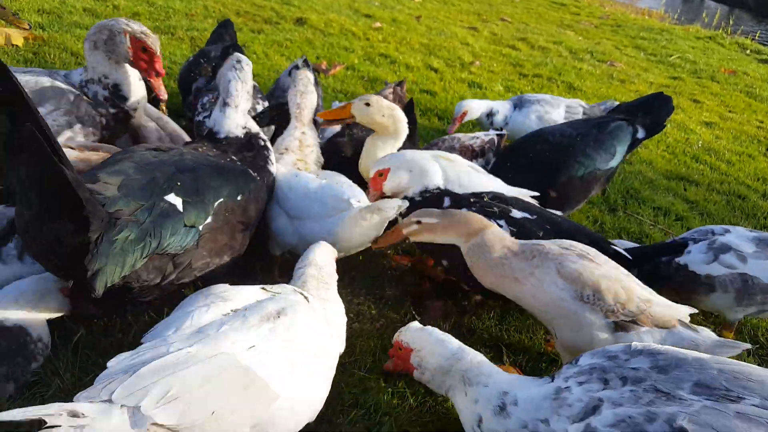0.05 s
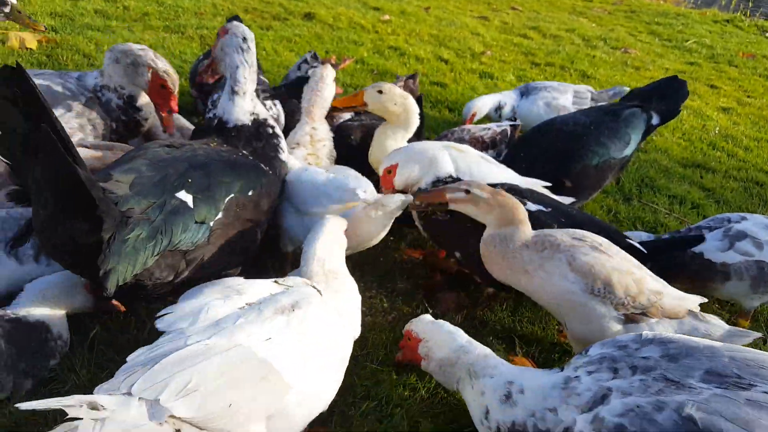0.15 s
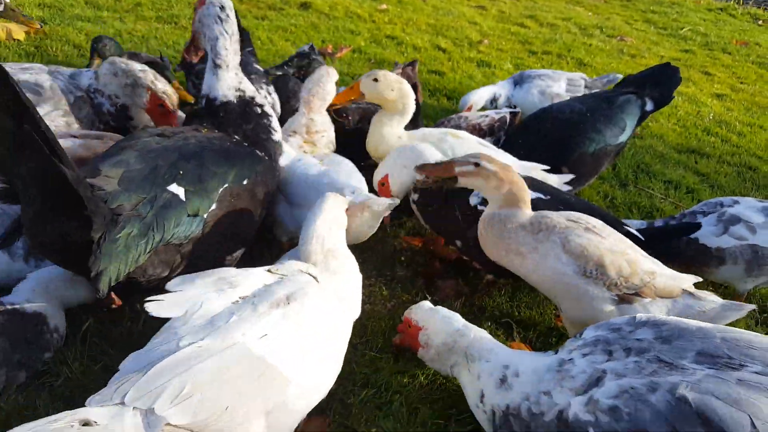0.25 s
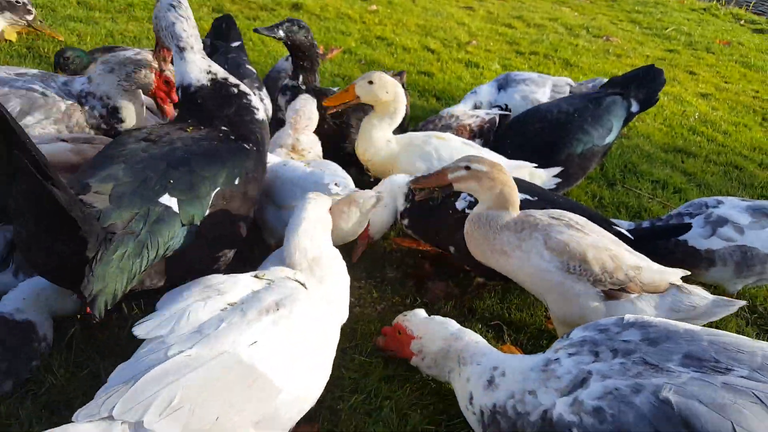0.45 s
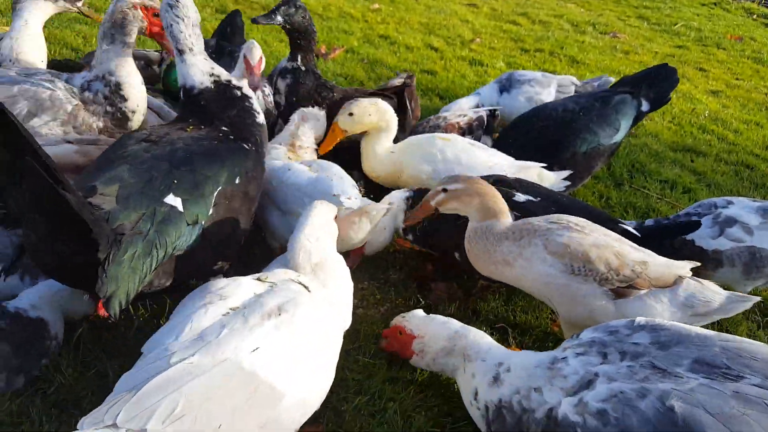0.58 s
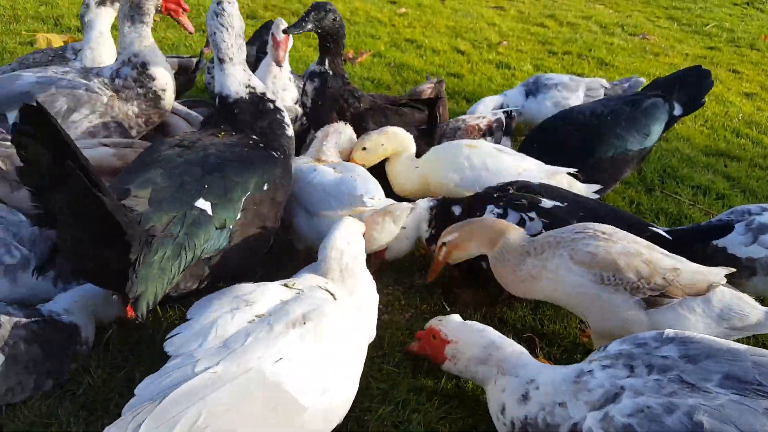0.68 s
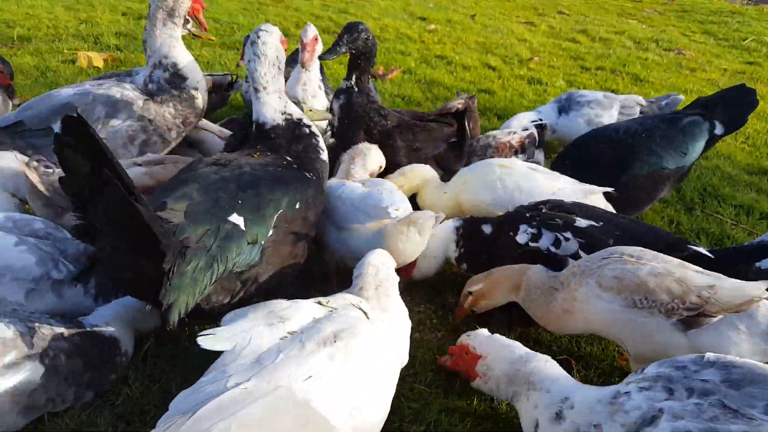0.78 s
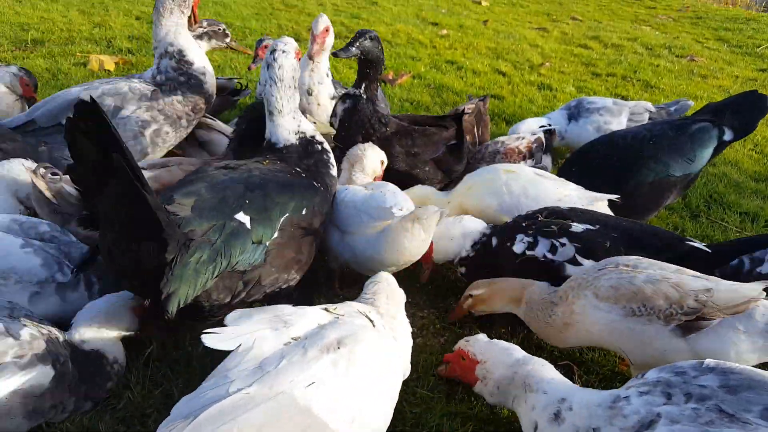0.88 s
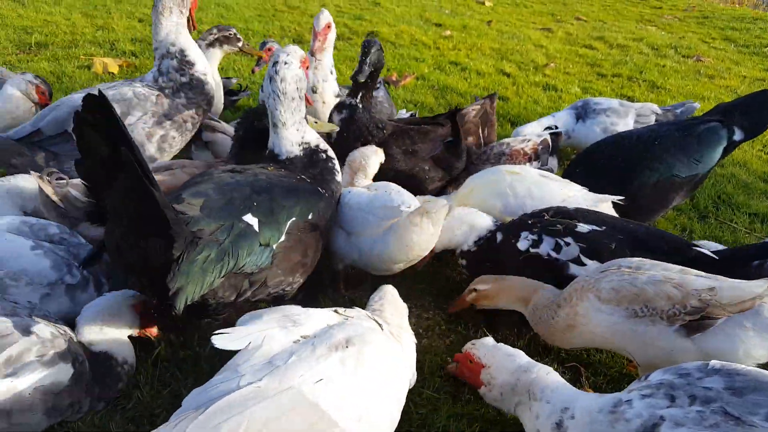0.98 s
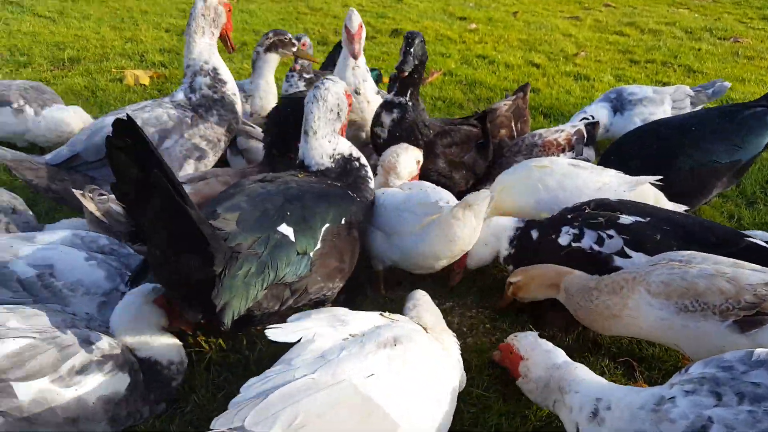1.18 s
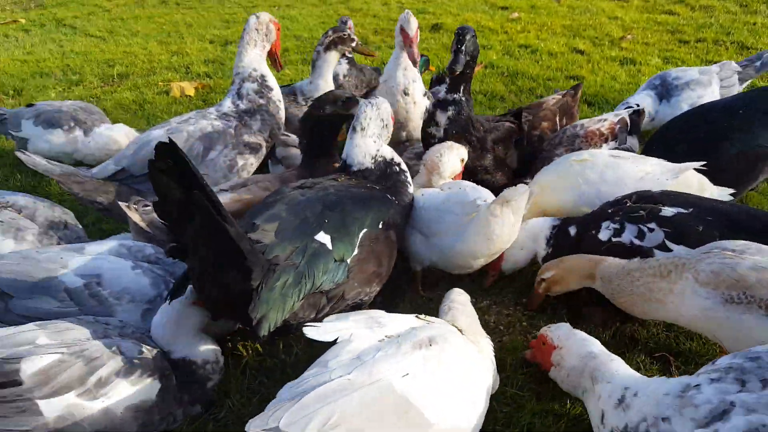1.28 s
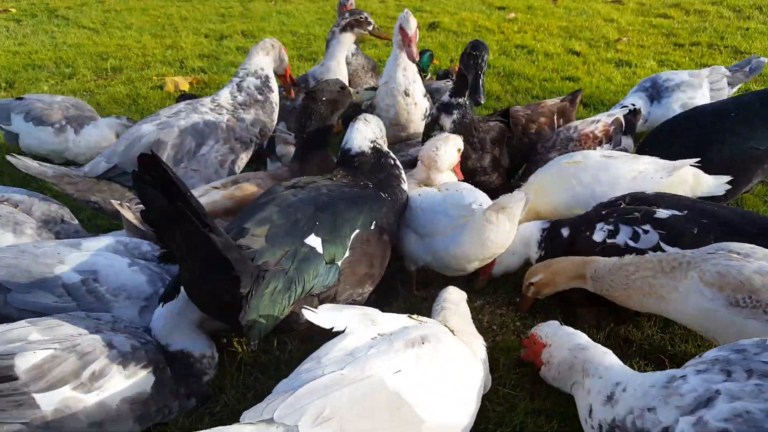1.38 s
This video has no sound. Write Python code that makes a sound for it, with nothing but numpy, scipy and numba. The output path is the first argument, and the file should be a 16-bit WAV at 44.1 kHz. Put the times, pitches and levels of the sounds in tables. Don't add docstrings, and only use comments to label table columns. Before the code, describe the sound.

A single short, nasal duck quack sounds at about 0.24-0.30 s, edged by tiny windpipe wheezes and preceded by a low bill knock at 0.2 s. Throughout the roughly 1.5 s, bills click, nibble and peck, sharpest near 0.15 and 0.65 s, with grass tearing, faint coos, hoarse huffs and feather rustles. Quiet park hum and breeze continue; low wind thumps grow after 1.0 s, strongest near 1.45 s.

```python
import sys
import numpy as np
from scipy import signal
from scipy.io import wavfile
from scipy.ndimage import uniform_filter1d
from numba import njit

SR = 44100
rng = np.random.default_rng(int(sys.argv[2]) if len(sys.argv) > 2 else 0)


def dump(signal):
    limited = np.clip(np.atleast_2d(signal).T, -1, 1)
    pcm = np.round(limited * 32767).astype(np.int16)
    wavfile.write(sys.argv[1], SR, pcm)


def to_linear_factor(level_db):
    exponent = np.asarray(level_db, float) / 20
    return 10 ** exponent


N = 63945


@njit
def svf(x, hz, width, low):
    y, b, l = np.empty(len(x)), 0., 0.
    for i in range(len(x)):
        g, k = np.tan(np.pi * hz[i] / SR), width / hz[i]
        v = (b + g * (x[i] + 1e-18 - l)) / (1 + g * (g + k))
        y[i] = low * (l + g * v) + (1 - low) * k * v
        b, l = 2 * v - b, l + 2 * g * v
    return y


def band(x, hz, width, low=0.):
    return svf(x, np.clip(hz + np.zeros(len(x)), 10, .45 * SR), float(width), low)


def noise():
    return rng.standard_normal(N)


def unit(x):
    return x / np.sqrt(np.mean(x ** 2))


def walk(rate):
    hold = int(SR / rate)
    steps = np.repeat(rng.standard_normal(N // hold + 1), hold)
    return 1.28 * uniform_filter1d(uniform_filter1d(steps, hold), hold)[:N]


def curve(table, axis):
    rows = np.array(table)
    return np.interp(np.arange(N) / SR, rows[:, 0], rows[:, axis])


def swell(start, length):
    return np.sin(np.pi * np.clip((np.arange(N) / SR - start) / length, 0, 1))


def lean(pan_db):
    return np.array([[pan_db], [-pan_db]]) / 2


def place(x, pan_db):
    lag_s = 4e-5
    late = np.interp(np.arange(N) - lag_s * SR, np.arange(N), x)
    return to_linear_factor(lean(pan_db)) * np.array([late, x])


# (frequency [Hz], level [dB per Hz])
PARK_TONE = [(88, -30), (150, -5.5), (492, -9), (713, -5.5), (866, -10), (1230, -7.5), (2340, -15),
             (7530, -21), (15800, -31.5)]
# (frequency [Hz], likeness [0-1])
PARK_LIKENESS = [(60, 0), (250, 1), (1000, 0.59), (2000, 0.13), (4000, 0), (9000, .0)]
# (frequency [Hz], left minus right [dB])
PARK_BALANCE = [(250, 3), (4000, -5), (6500, 2.5), (14000, 3.5)]


def park():
    def read(table, hz):
        rows = np.array(table)
        return np.interp(np.log(hz), np.log(rows[:, 0]), rows[:, 1])

    level_db = -48
    out, slow, quick = 0, walk(2.27), walk(23.0)
    for hz in 160 * 2 ** np.arange(0, 6.7, 1 / 3):
        edges = [hz / 1.143, min(hz * 1.126, .45 * SR)]
        third = signal.butter(2, edges, "band", fs=SR, output="sos")
        mid, side = unit(signal.sosfilt(third, rng.standard_normal((2, N))))
        like = np.clip(read(PARK_LIKENESS, hz), 0, .99)
        db = read(PARK_TONE, hz) + 10 * np.log10(hz)
        db = db + 0.78 * slow + 0.72 * quick + 1.0 * walk(11.85) + lean(read(PARK_BALANCE, hz))
        out = out + to_linear_factor(db) * (np.sqrt(1 + like) * mid + np.sqrt(1 - like) * side * np.array([[1], [-1]]))
    return unit(out) * to_linear_factor(level_db)


def breeze():
    level_db, buffet_db, centre_hz, width_hz, shared = -49, 3, 83.7, 68.5, 0.19

    def tumble():
        air = band(band(noise(), centre_hz, width_hz), centre_hz, 2.8 * width_hz)
        return unit(air) * to_linear_factor(buffet_db * walk(24.9))

    own = np.array([tumble(), tumble()])
    return to_linear_factor(level_db) * (np.sqrt(1 - shared) * own + np.sqrt(shared) * tumble())


# (time [s], length [s], level [dB], centre [Hz], left minus right [dB])
GUST_THUMPS = [(.005, 0.029, -39.5, 112, 7), (0.598, 0.06, -47.5, 104, -5), (0.722, 0.069, -43, 90, -7),
               (.8, .05, -50, 100, -6), (0.902, .07, -50.5, 83, -5), (1.009, 0.042, -35.5, 109.5, 0),
               (1.07, 0.02, -41, 140, -5), (1.16, 0.031, -47, 121, -2), (1.269, 0.0364, -43.5, 93, 2),
               (1.32, 0.033, -39, 113, -6), (1.374, 0.023, -37, 134, 1), (1.391, 0.035, -36.5, 157, 6),
               (1.436, 0.033, -31.5, 165.5, 0)]


def gusts():
    roar_db, out = -7, 0
    for s, d, db, hz, pan in GUST_THUMPS:
        waver = walk(60.24) + 0.9 * np.array([walk(39.83), walk(39.96)])
        turn = np.cumsum(hz * (1 + 0.131 * waver), axis=1) / SR
        middle = int(max(s + d / 2, 0) * SR) % N
        turn = turn - turn[:, [middle]]
        thump = np.sin(2 * np.pi * turn + np.array([[.6], [-.6]]))
        out = out + to_linear_factor(db + 3.5 + 2.1 * walk(79.9) + lean(pan)) * swell(s, d) * thump
        roar = unit(band(band(noise(), 1.3 * hz, hz), 1.54 * hz, 1.17 * hz))
        out = out + to_linear_factor(db + roar_db) * swell(s, d) * roar
    return out


def breath(calls, flutter_db):
    out, t = 0, np.arange(N) / SR
    for s, d, db, start_hz, end_hz, width in calls:
        hz = np.interp(t, [s, s + d], [start_hz, end_hz])
        air = unit(band(band(noise(), hz, width), hz, 1.25 * width))
        out = out + to_linear_factor(db + flutter_db * walk(40.02)) * swell(s, d) ** 0.37 * air
    return out


# (time [s], length [s], level [dB], start [Hz], end [Hz], width [Hz])
COOS = [
    (-.05, 0.45, -51.5, 251, 266, 56),
    (.3, 0.38, -56, 276, 272, 58),
    (.76, 0.14, -54, 268, 328, 59.6),
    (1.08, 0.1, -52.5, 238, 322, 60),
]


def coo():
    return breath(COOS, flutter_db=5.5)


def clicks(events, cycles, crack_db):
    out, chance = np.zeros((2, N + 512)), rng.standard_normal((len(events), 2, 512))
    t = np.arange(512) / SR
    for (s, db, hz, pan), hiss in zip(events, chance):
        turn = hiss[:, :1] * min(hz / 5000, 1.5)
        attack = 1 - np.exp(-t * hz / 0.61)
        decay = np.exp(-np.log(1000) * t * hz / cycles)
        ring = attack * decay * np.sin(2 * np.pi * hz * t + turn)
        dulled = uniform_filter1d(hiss + hiss[0], size=1 + int(SR / hz / 5))
        crack = to_linear_factor(crack_db) * np.exp(-t / 0.002) * dulled
        i = int(s * SR)
        out[:, i:i + 512] += to_linear_factor(db + lean(pan)) * (ring / np.abs(ring).max() + crack)
    return out[:, :N]


def grass():
    tears_per_s, level_db, spread_db, top_db = 270, -55, 3.5, 13
    rows = []
    for when, force, pitch, side in rng.random((int(tears_per_s * N / SR), 4)):
        db = level_db + min(top_db, -spread_db * np.log(1 - force))
        rows.append((when * (N / SR), db, 2500 * 5.3 ** pitch, 16 * (side - .35)))
    return clicks(rows, cycles=27.5, crack_db=-11)


# (time [s], peak [dB], pitch [Hz], left minus right [dB])
MORE_SNAPS = [(.0388, -44, 2610, -2), (.4783, -43, 3950, 1.5), (0.8014, -49, 3500, -2),
              (0.833, -43, 6550, 5), (0.8634, -42, 3670, -2), (0.9176, -40, 2710, -.5),
              (1.0932, -33, 3400, -4), (1.1807, -39, 3580, -6), (1.242, -37, 5000, 6),
              (1.325, -44, 2930, 3.5)]
# (time [s], peak [dB], pitch [Hz], left minus right [dB])
BILL_SNAPS = [(0.0893, -38.5, 3340, -10), (0.127, -46, 2820, -4), (0.145, -27, 3600, 0),
              (0.166, -34, 3840, -4), (0.2998, -33, 8000, -2), (0.3564, -36, 4030, -10),
              (0.3936, -32, 3950, -4), (0.4145, -38, 3830, -7), (0.445, -30.5, 5000, 0),
              (0.495, -38, 7040, 3), (0.554, -35.5, 4070, -5), (0.6261, -31.5, 3380, -7.5),
              (0.645, -23.5, 3350, 2), (0.6614, -56, 3300, -1), (0.7061, -53, 3370, -2),
              (0.72, -40, 3730, -14), (0.743, -39.5, 3330, -12), (0.8894, -45, 3280, -7),
              (0.9485, -34.5, 4850, -1), (1.0765, -40, 3870, -14), (1.1496, -40, 6260, 12),
              (1.2101, -32, 6650, -1), (1.226, -40, 7800, -4)]


def snaps():
    return clicks([*BILL_SNAPS, *MORE_SNAPS], cycles=12.4, crack_db=-13)


# (time [s], length [s], level [dB], start [Hz],
# end [Hz], width [Hz])
HUFFS = [(.08, 0.39, -53.5, 1630, 1590, 403), (.38, 0.32, -54, 837, 800, 300),
         (.42, 0.083, -57, 1310, 1250, 250), (.72, 0.39, -52, 1450, 1190, 343),
         (.8, 0.29, -55, 1920, 1750, 302), (.95, 0.36, -52, 697, 800, 350),
         (1.02, 0.275, -49, 1270, 1430, 640), (1.33, 0.18, -54.5, 770, 790, 484),
         (.298, 0.044, -46, 1900, 1500, 900), (1.39, 0.059, -58, 416, 396, 302),
         (1.43, .05, -45, 447, 600, 510)]


def huff():
    return breath(HUFFS, flutter_db=2.2)


# (time [s], length [s], level [dB], centre [Hz], left minus right [dB])
BRUSHES = [(0.085, 0.038, -55, 7100, 7), (0.098, 0.036, -59, 12500, 6), (0.452, 0.15, -55, 8500, 11),
           (0.46, 0.14, -62.5, 13000, 9), (0.71, 0.055, -53, 6150, 1), (0.915, 0.11, -62, 13000, 6),
           (1.025, 0.1, -55.5, 5600, 4), (1.199, 0.081, -55, 7700, 8), (1.22, 0.084, -63, 14300, 7),
           (1.316, 0.046, -54, 7150, 14.5), (1.32, 0.049, -63, 13000, 14)]


def rustle():
    out = 0
    for s, d, db, hz, pan in BRUSHES:
        pair = np.array([unit(band(noise(), hz, .5 * hz)) * to_linear_factor(3.7 * walk(150)) for _ in range(2)])
        out = out + to_linear_factor(db + lean(pan)) * swell(s, d) ** 0.66 * pair
    return out


# (time [s], peak [dB], pitch [Hz], left minus right [dB])
TURF_PECKS = [(0.087, -37, 1740, 4), (0.144, -31.5, 1020, 3), (0.206, -31, 1480, -3.5),
              (0.356, -27, 1250, 0), (0.392, -36.5, 1240, -1), (0.444, -49, 750, 9), (0.624, -41, 680, 4),
              (0.754, -37.5, 1510, 3), (0.871, -48, 1230, 2.0), (1.066, -35, 1340, 6.5),
              (1.175, -42, 1360, 2), (1.203, -35.5, 1620, -2)]


def pecks():
    return clicks(TURF_PECKS, cycles=3.6, crack_db=-3.5)


# (time [s], peak [dB], pitch [Hz], left minus right [dB])
BILL_KNOCKS = [
    (.2048, -33, 680, 0),
    (1.2175, -41, 1900, 0),
    (1.2437, -33, 1260, 0),
]


def knocks():
    return clicks(BILL_KNOCKS, cycles=13, crack_db=-12)


# (time [s], length [s], start [Hz], end [Hz], level [dB])
WINDPIPE = [
    (.209, .017, 950, 1450, -48),
    (.225, .012, 1250, 950, -43),
    (.226, .008, 1600, 1500, -49),
    (.233, .012, 950, 620, -32),
    (.299, .011, 870, 930, -31.5),
    (.311, .008, 1000, 950, -41),
    (.33, .013, 1050, 880, -48),
]


def wheeze():
    out, t = 0, np.arange(N) / SR
    for s, d, start_hz, end_hz, db in WINDPIPE:
        hz = np.interp(t, [s, s + d], [start_hz, end_hz]) * (1 + 0.03 * walk(300))
        out = out + to_linear_factor(db + 3.2 * walk(242.0)) * swell(s, d) * np.sin(2 * np.pi * np.cumsum(hz) / SR)
    return out


# (time [s], pitch [Hz], chest level [dB], bill opening [dB])
QUACK_COURSE = [
    (.239, 200, -33, -1),
    (.2445, 203.6, -25, -3),
    (.25, 203, -24.5, 3),
    (.259, 202.8, -26, 2.5),
    (.267, 192, -26, 1),
    (.276, 206, -29, 1.5),
    (.281, 228, -24.5, -1.5),
    (.293, 228.6, -25, -7.5),
    (.302, 263, -36.5, -9.5),
]
# (centre [Hz], width [Hz], level [dB])
THROAT_RINGS = [(1158, 167, 3), (1700, 260, -8), (2085, 200, -10.5)]


def quack():
    first_pulse_s, jitter, shimmer_db, rasp_db, haze_db = .2686, .004, 1.1, -13, -29.5
    chest_hz, chest_low_hz, bill_top_hz, throat_sag_per_db = 915, 165, 2166, 0.08
    t, bill = np.arange(N) / SR, curve(QUACK_COURSE, axis=3)
    phase = np.cumsum(curve(QUACK_COURSE, axis=1) * (1 + jitter * walk(152))) / SR
    phase -= np.interp(first_pulse_s, t, phase)
    sounding = (t > QUACK_COURSE[0][0]) * (t < QUACK_COURSE[-1][0])
    push = sounding * to_linear_factor(curve(QUACK_COURSE, axis=2) + shimmer_db * walk(202.3))
    buzz = -push * sum(np.cos(2 * np.pi * k * phase) for k in range(1, 21))
    rasp = push * to_linear_factor(rasp_db + bill) * 10 * np.exp(-(phase % 1) / .5) * noise()
    chest = band(buzz, chest_hz, 1.27 * chest_hz, low=1.)
    chest = band(chest, 1.08 * chest_hz, 1.84 * chest_hz, low=1.)
    chest = chest - band(chest, chest_low_hz, 1.34 * chest_low_hz, low=1.)
    air = buzz * to_linear_factor(bill) + rasp
    sag = 1 + throat_sag_per_db * np.minimum(bill, 0)
    ring = 0
    for k, (hz, width, db) in enumerate(THROAT_RINGS):
        ring = ring + (-1) ** k * to_linear_factor(db) * band(air, hz * sag, width)
    bill_filter = signal.cheby1(4, 1, bill_top_hz, fs=SR, output="sos")
    voice = signal.sosfilt(bill_filter, chest + 2 * ring)
    haze = to_linear_factor(haze_db) * band(air + 6 * rasp, 2800, 1200)
    return voice + haze


# (delay [s], level [dB])
FLOCK_ECHOES = [
    (.006, -17),
    (0.012, -38),
    (0.022, -15),
    (0.04, -27),
]


def flock_echo(duck):
    dull = band(duck, 1170, 1800)
    return np.array([sum(to_linear_factor(db) * np.roll(dull, int(s * SR * stretch)) for s, db in FLOCK_ECHOES)
                     for stretch in (.93, 1.08)])


def scene():
    background = park() + breeze() + gusts()
    breaths = place(coo() + huff(), -0.24)
    feeding = grass() + snaps() + pecks() + knocks()
    duck = 1.5 * wheeze() + quack()
    return background + breaths + feeding + rustle() + place(duck, -1.7) + flock_echo(duck)


def low_pass(x):
    return signal.sosfilt(signal.butter(12, 16470, fs=SR, output="sos"), x)


def record(dry):
    notch_hz, notch_width_hz, notch_depth, top_hz, bass_cut_hz = 9970, 3300, 0.47, 15900, 33
    wet = np.array([x - notch_depth * band(x, notch_hz, notch_width_hz) for x in dry])
    wet = signal.sosfilt(signal.ellip(10, .2, 70, top_hz, fs=SR, output="sos"), wet)
    wet = signal.sosfilt(signal.butter(2, bass_cut_hz, "high", fs=SR, output="sos"), wet)
    return low_pass(wet)


dry = scene()
out = record(dry)
dump(out)
```